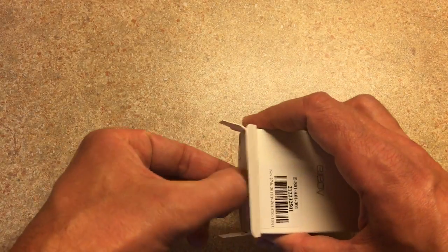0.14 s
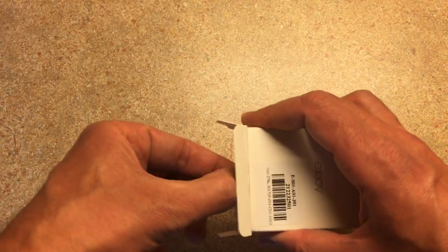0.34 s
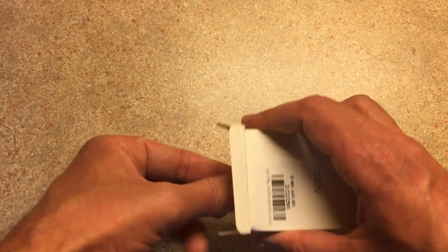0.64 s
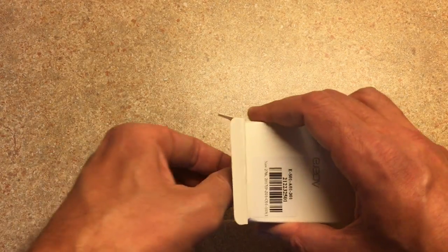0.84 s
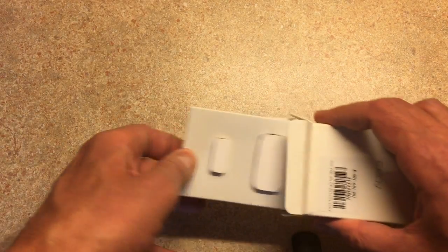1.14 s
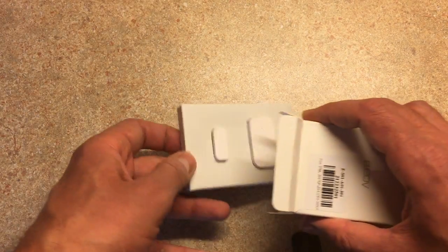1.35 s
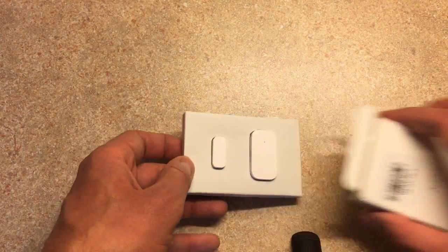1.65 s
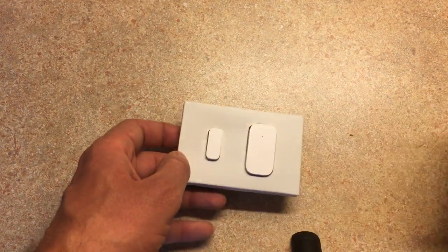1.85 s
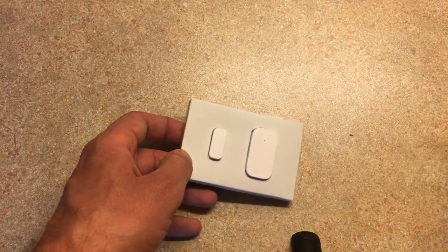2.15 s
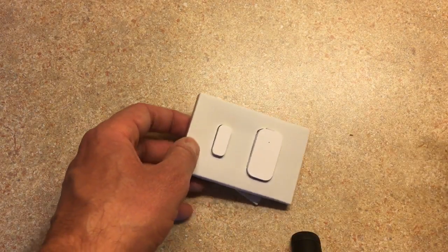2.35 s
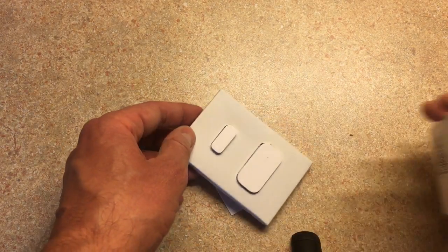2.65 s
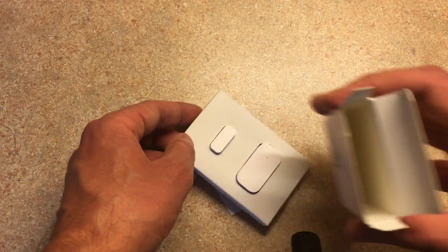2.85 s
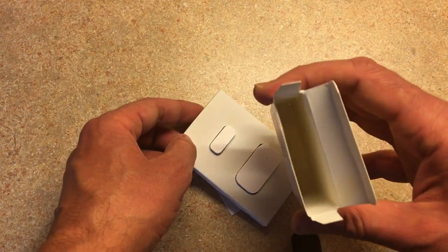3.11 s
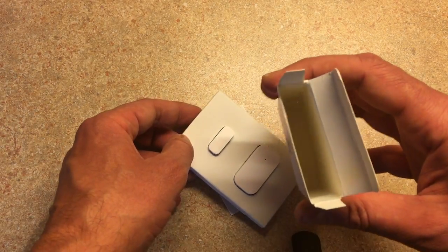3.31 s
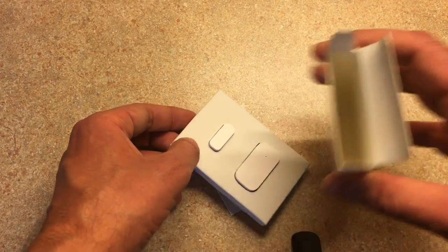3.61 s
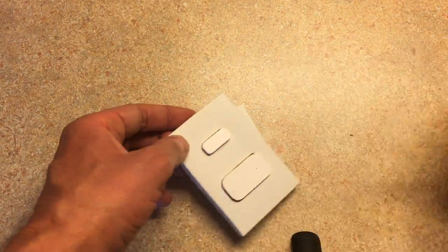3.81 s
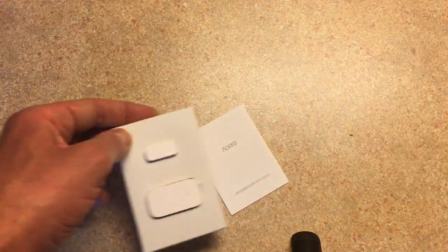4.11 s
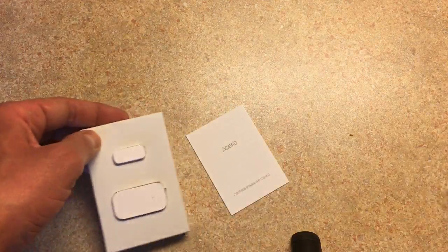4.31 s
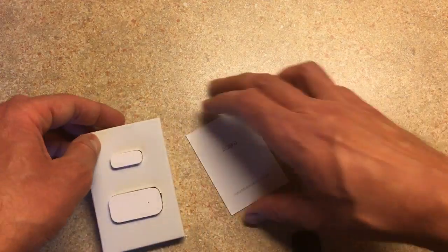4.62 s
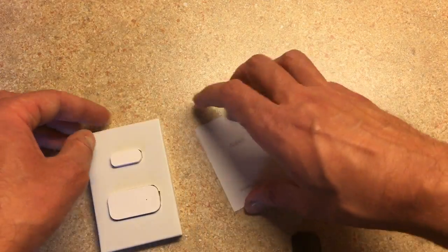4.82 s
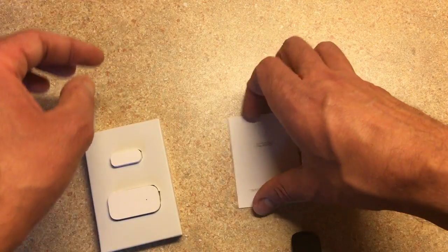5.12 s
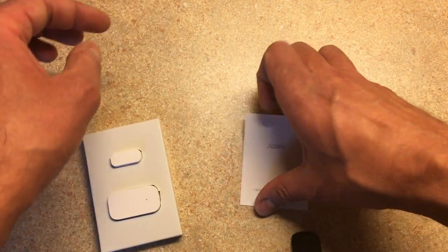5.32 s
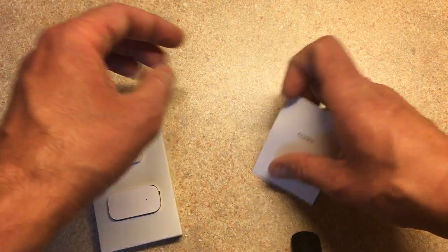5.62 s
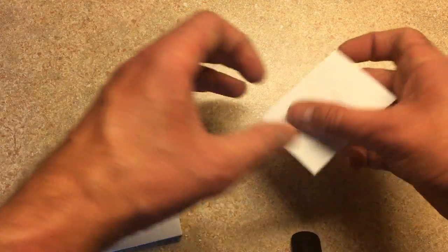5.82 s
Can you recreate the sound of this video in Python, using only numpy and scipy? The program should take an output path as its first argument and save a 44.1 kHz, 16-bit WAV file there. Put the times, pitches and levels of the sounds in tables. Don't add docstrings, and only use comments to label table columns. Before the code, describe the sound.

Close, dry sound of hands unpacking a small cardboard box on a table in a quiet room with faint low hum and slight echo. It opens with finger rubs and a small tap, then around 0.5-0.8 s a cluster of light hollow taps and crisp flap crackles. At 1.0-1.25 s the tray slides out with a bright papery scrape, clicks and brief squeaks. Hollow card knocks follow at about 1.3, 1.4 (stronger), 1.55-1.7 and 2.03 s. From 2.1 to 3.7 s there are only faint brushes and shuffles. Soft rubs and small bumps come at 3.8-4.3 s, a clear tap at 4.46 s, a sharp hard knock at 4.78 s and another at 4.88 s. Short low rubbing jolts accompany dragging on the table until 5.4 s. A very sharp, bright paper snap cracks at 5.29 s, followed by crackles near 5.4 s, small creases and light ticks around 5.8 s, then quiet.

```python
import sys
import numpy as np
from scipy import signal
from scipy.io import wavfile
from scipy.ndimage import uniform_filter1d

SR = 44100
rng = np.random.default_rng(int(sys.argv[2]) if len(sys.argv) > 2 else 0)


def to_wav(s):
    ch = np.atleast_2d(s).T
    pcm = np.round(np.clip(ch, -1, 1) * 32767)
    wavfile.write(sys.argv[1], SR, pcm.astype(np.int16))


def ratio_of_db(decibels):
    return 10 ** (np.asarray(decibels, float) / 20)


N = 262832

# (frequency [Hz], density [dB per Hz])
AIR_SPECTRUM = [(18, -44), (33, 3.5), (42, -14), (54, -9), (64, 4), (81, -10.5), (98, -24), (164, -20.5),
                (227, -32), (341, -25.5), (497, -38), (1030, -29.5), (1390, -32.5), (1540, -34),
                (2130, -43), (14500, -57.5), (19000, -93)]
# (frequency [Hz], width [Hz], level [dB])
RUMBLE_BANDS = [(66.3, 9.5, -62)]
# (frequency [Hz], t60 [s])
ROOM_DECAY = [(200, 0.68), (1500, 0.31), (5000, 0.085), (15000, 0.11)]
# (time [s], peak level [dB])
SHUDDERS = [
    (1.469, -56),
    (2.039, -47),
    (4.06, -58),
    (4.259, -50.5),
    (4.879, -49),
]
# (time [s], level [dB], decay rate [dB/s])
DRAG_JOLTS = [
    (4.666, -52.5, 296),
    (4.728, -49.5, 120),
    (4.864, -41, 198),
    (4.925, -46, 160),
    (5.007, -47, 201),
    (5.078, -44.5, 217),
    (5.228, -49.5, 600),
    (5.352, -47.5, 700),
    (5.42, -63, 899),
]
# (time [s], rms level [dB], frequency [Hz], length [s])
SQUEAKS = [(.475, -60, 3900, .012), (.486, -58, 4000, 0.0076), (1.008, -49.5, 5400, 0.014),
           (1.025, -32, 1186, .004), (1.062, -43.5, 2450, 0.011), (1.061, -45.5, 3650, 0.0087),
           (1.076, -48, 1740, .016), (1.077, -46, 4050, .007), (1.11, -55, 1490, .02),
           (1.115, -54, 3500, 0.027), (1.145, -52.5, 6500, 0.026), (1.162, -54, 8000, .02),
           (1.165, -50.5, 6900, .02), (1.185, -53, 6000, .02), (1.2, -56, 1750, 0.034),
           (1.462, -51, 1600, 0.015), (1.635, -58.5, 1750, 0.026), (1.945, -64, 3200, 0.026),
           (3.871, -52, 680, .008), (3.86, -54, 1390, .02), (3.925, -57.5, 2300, 0.028),
           (4.782, -32, 1194, 0.00502), (4.457, -40, 1750, 0.00398), (4.83, -49.5, 1230, .02),
           (5.088, -59, 3200, 0.014), (5.085, -57, 2050, 0.013), (5.117, -56.5, 3200, 0.019),
           (5.115, -55, 2200, 0.018), (5.122, -50.5, 1070, 0.023), (5.135, -58, 2450, 0.019),
           (5.09, -50, 505, .04), (5.347, -54, 6400, 0.014), (5.685, -60, 2450, .02),
           (5.573, -52, 7800, 0.019)]
# (time [s], peak level [dB], centre frequency [Hz], sparkle
# [dB])
CREASE_SNAPS = [(.083, -48, 2880, -12), (.131, -49, 2320, -6), (0.568, -33.5, 2150, -20),
                (.5935, -37.5, 3550, -20), (.6075, -40, 5640, -16), (.617, -30, 5940, -4),
                (0.627, -35.5, 2580, -4), (1.075, -34, 4190, -16), (1.29, -59, 2110, -21),
                (1.579, -43.5, 2160, -20), (2.693, -43.5, 2210, 0), (3.8157, -48, 2800, -4),
                (3.888, -46, 2050, 10.5), (4.034, -51, 2000, -20), (4.46, -45, 2220, -21),
                (4.818, -42, 2020, -4), (5.0244, -37, 4500, -2), (5.2154, -59.5, 2230, 2),
                (5.225, -41, 2060, -12), (5.249, -54.5, 2490, 10.5), (5.2877, -16, 4520, 3),
                (5.2936, -15.5, 2290, -14), (5.386, -36.5, 4430, -21), (5.399, -29.5, 2090, -19),
                (5.4056, -33, 5740, -19), (5.4212, -27.5, 6600, -18), (5.536, -41, 3180, -22),
                (5.565, -42, 4230, -19), (5.576, -37, 7400, -11), (5.793, -36.5, 4030, -9),
                (.989, -43, 2000, -15), (1.005, -30, 1990, -13), (1.0125, -30, 2200, -15),
               (1.045, -35, 2600, -12), (3.878, -60, 9000, 10), (4.2575, -45, 4500, 2),
               (4.865, -44, 5000, -10), (5.379, -45, 6000, -15), (5.5024, -49, 4620, -10),
               (5.557, -47, 7700, -5), (5.711, -42, 9500, -3), (5.716, -50, 9000, -1),
               (5.427, -39, 6800, -8), (5.788, -49, 7900, 6), (.5965, -36, 6200, -6),
               (1.688, -46, 5500, -17), (5.2915, -21, 4500, -2), (5.2965, -28, 3000, -4),
               (1.305, -36, 5900, -5), (4.7743, -32, 3820, -16), (5.346, -42, 6400, -10),
               (5.569, -46, 5000, -8), (5.58, -46, 3500, -8), (5.686, -50, 2400, -8), (3.924, -51, 5970, 2)]
# (frequency [Hz], density [dB per Hz])
CRACK_SPECTRUM = [(470, -84), (800, -53), (2050, -5.5), (3870, -3.5), (5250, -4), (7920, -9.5),
                  (13800, -14), (16400, -19), (19000, -31)]
# (frequency [Hz], density [dB per Hz])
HISS_SPECTRUM = [(240, -54), (400, -42), (609, -26.5), (1660, -36), (2440, 1.5), (2780, 0), (3600, 2.5),
                 (9040, 3), (16400, -3), (17500, -15), (19000, -60)]
# (frequency [Hz], density [dB per Hz])
WALL_SPECTRUM = [(300, -40), (550, 0), (900, -6), (1300, -2), (1800, -4.5), (2400, -3.5), (3200, -18),
                 (5000, -38.5)]
# (frequency [Hz], width [Hz], gain [dB])
FLAP_RESONANCES = [(2260, 260, 4), (3460, 2400, 6), (5970, 1200, 3)]
# (time [s], hiss level [dB], rise [s], fall [s])
BRUSHES = [(0, -39.5, .0063, 0.028), (.036, -45, 0.037, 0.05), (0.246, -50.5, 0.018, 0.079),
           (0.365, -53.5, 0.024, 0.033), (.917, -54.5, 0.085, 0.029), (1.51, -56.5, 0.047, 0.016),
           (1.585, -57.5, .01, .054), (1.935, -52.5, 0.051, 0.063), (2.035, -52.5, 0.021, 0.1),
           (2.125, -62, .05, 0.051), (2.286, -55, 0.038, 0.12), (2.68, -66, .06, 0.063),
           (2.915, -63, 0.068, .052), (2.952, -61, .04, .011), (3.544, -62.5, 0.094, 0.02),
           (3.665, -55, 0.053, 0.031), (3.93, -49.5, 0.061, 0.015), (3.957, -61, 0.022, .012),
           (4.068, -60, 0.015, 0.016), (5.002, -58.5, 0.049, 0.065), (5.397, -48.5, 0.025, 0.086),
           (5.514, -61, 0.02, 0.13), (5.57, -51.5, 0.029, 0.043), (5.712, -59.5, 0.87, 0.13)]
# (time [s], hiss level [dB], rise [s], fall [s], brightness [dB])
SCRAPES = [(.505, -50, 0.055, 0.012, -3.5), (.62, -57, 0.18, 0.097, -4.5), (1.01, -46.5, 0.03, 0.13, 2.5),
           (1.775, -60.5, 0.077, 0.096, -1.5), (2.442, -70.5, 0.067, 0.059, 9.5),
           (2.518, -62.5, 0.04, 0.23, 2.5), (2.567, -73, 0.17, 0.12, -10), (2.905, -69, 0.18, 0.14, 4.5),
           (4.07, -67, 0.22, 0.25, -1), (4.537, -62, .052, 0.056, 5.5), (4.695, -63, 0.018, .091, 1),
           (4.748, -66, 0.04, 0.022, 12.5), (4.777, -60, .008, 0.03, -10), (4.905, -56, 0.39, 0.064, -2.5),
           (5.078, -64.5, 0.0068, 0.12, -6), (5.194, -69.5, .099, 0.32, -1),
           (5.69, -72.5, 0.048, 0.088, 16), (5.791, -63.5, 0.019, 0.018, 16)]
# (time [s], hiss level [dB], rise [s], fall [s], brightness [dB])
SLIDES = [(1.001, -42, .01, 0.094, -3), (1.043, -47, .032, .11, -9), (1.071, -42.5, .038, 0.24, 4.5),
          (1.127, -53.5, .04, 0.064, 11.5), (1.163, -42.5, .07, 0.081, -3), (5.298, -52, .0027, 0.23, -5),
          (5.338, -63.5, .044, .06, -21), (5.47, -66, .06, .08, 12), (5.67, -68, .1, .08, 12),
          (1.295, -64, .02, .015, 14), (1.13, -48, .05, .06, 0), (4.82, -58, .03, .03, -10),
          (5.94, -78, .062, 0.065, 15)]
# (time [s], body level [dB], rise [s], fall [s])
SQUEEZES = [(.074, -58.5, .047, 0.14), (.213, -58, 0.071, 0.39), (.763, -60.5, 0.092, 0.27),
            (.875, -54, 0.2, 0.17), (1.202, -49.5, 0.039, 0.082), (1.289, -52.5, 0.017, 0.082),
            (1.418, -44, 0.024, 0.13), (1.55, -45.5, 0.006, 0.1), (1.669, -54, .0027, 0.13),
            (2.137, -54, 0.046, 0.054), (3.865, -50.5, 0.1, 0.061), (4.185, -58, 0.24, .022),
            (4.275, -53.5, 0.11, 0.051), (4.47, -39, 0.012, 0.025), (4.806, -47.5, .024, 0.17),
            (5.121, -43, 0.054, 0.035)]
# (frequency [Hz], level [dB], t60 [s])
BOX_MODES = [(707, -15.5, 0.059), (855, 0.5, 0.017), (1190, -13, 0.095), (1370, -15, 0.033),
             (1400, -20.5, 0.037), (1690, -8.5, 0.045), (1850, -6, 0.025), (2400, -16, .04),
             (2900, -27, .035)]
# (frequency [Hz], level [dB], t60 [s])
TABLE_MODES = [(75, -19, 0.028), (145, -2, 0.063), (224, -11, 0.089), (345, -1, .07), (517, -13.5, 0.16)]
# (time [s], peak level [dB], own ring [Hz], crack re peak [dB])
EDGE_TAPS = [(.002, -28, 2350, -6), (.01, -50, 2190, -8), (.109, -49.5, 1100, -6), (.475, -33, 1370, -26),
             (0.4887, -34.5, 1480, -21), (.51, -33, 1370, -25), (.547, -39, 1380, -28),
             (0.578, -37.5, 1430, -5), (.594, -55, 2460, 8), (0.672, -33.5, 1370, -37),
             (0.768, -37.5, 1500, -19), (1.001, -32.5, 1540, -11), (1.011, -37, 1810, 1),
             (1.3027, -26, 1660, -11), (1.551, -25.5, 1320, -17), (1.585, -30, 855, -20),
             (1.677, -37.5, 1370, -7), (1.681, -29.5, 1480, -44), (1.688, -34, 1500, -16),
             (2.033, -31.5, 1335, -34), (2.039, -29.5, 1430, -16.5), (3.817, -47, 1490, -7),
             (4.455, -23, 1260, -15.5), (4.461, -28, 1700, -16), (4.74, -39, 1500, -20),
             (4.7751, -16, 1404, -11.5), (4.779, -24, 1190, -22), (4.823, -38, 1190, -20),
             (4.878, -28, 1690, 0), (5.779, -51, 2240, -10), (5.79, -39, 1930, -18),
             (5.804, -36.5, 1150, -26)]
# (time [s], peak level [dB], own ring [Hz], crack re peak [dB])
MORE_EDGE_TAPS = [
    (.772, -41.5, 1380, -14),
    (1.4145, -22, 1460, -14),
    (1.418, -26.5, 1950, -11),
    (1.555, -31.5, 800, -22),
    (1.698, -35, 750, -24),
    (4.886, -34, 1140, -10),
    (4.262, -37, 880, -9),
    (4.466, -36, 2360, -15),
    (3.83, -47.5, 1300, -20),
    (3.89, -47, 1500, -20),
]
# (time [s], peak level [dB], own ring [Hz], crack re peak [dB])
SCUFFS = [
    (.037, -40, 2260, 1),
    (1.073, -37.5, 1680, -10),
    (1.249, -36, 1990, -2),
    (2.529, -51, 646, -14),
    (3.855, -39, 1340, -25),
    (3.869, -42, 666, -30),
    (4.477, -36.5, 1530, -30),
]
# (time [s], peak level [dB], own ring [Hz], crack re peak [dB], thud re peak [dB])
TABLE_BLOWS = [(1.024, -29, 1190, -16, -12), (1.063, -34.5, 2500, -14, -8), (1.593, -34.5, 1450, -12, -11),
               (1.413, -19, 1476, -8, -14), (2.03, -27, 1444, -38, -16), (3.56, -52, 630, -17, 6),
               (4.09, -48, 1690, -5, -1.5), (4.165, -43.5, 495, -10, -1), (4.205, -49, 950, -10, 0),
               (4.243, -47, 517, -4, -8), (4.258, -37, 1030, -9.5, -4.5), (4.661, -49.5, 1030, -12, 5.5),
               (4.882, -28, 1163, -24, -7), (5.079, -43, 523, -19, 1), (5.134, -36, 530, -5.5, -3),
               (5.231, -47.5, 549, -10, 5.5), (5.289, -29.5, 2210, 5.5, -9), (5.351, -48, 473, -1, 8),
               (5.558, -56.5, 2210, 14, 10.5), (5.665, -44.5, 2320, -13, -15), (5.712, -52, 2320, -7, -28)]

BRUSH_BODY_DB, BRUSH_BRIGHT_DB = -2.5, 0
SCRAPE_BODY_DB, SLIDE_BODY_DB = 5.5, -6.5
SQUEEZE_HISS_DB, SQUEEZE_BRIGHT_DB = -19.5, -9
EDGE_THUD_DB, EDGE_RATTLE_S = -26, 0.0038
SCUFF_THUD_DB, SCUFF_RATTLE_S = -11, 0.014
BLOW_RATTLE_S = 0.0059


def rms_one(x):
    return x / np.sqrt(np.mean(x ** 2) + 1e-20)


def peak_one(x):
    return x / (abs(x).max() + 1e-20)


def read(points, hz):
    f, value = np.transpose(points)
    return np.interp(np.log(hz + 1), np.log(f + 1), value)


def add(mix, s, sound):
    part = mix[max(round(s * SR), 0):][:len(sound)]
    part += sound[:len(part)]


def filtered(x, order, hz, kind):
    return signal.sosfilt(signal.butter(order, hz, kind, fs=SR, output="sos"), x)


def resonate(x, hz, width):
    return signal.lfilter(*signal.iirpeak(hz, max(hz / width, .3), SR), x)


def coloured(x, points):
    hz = abs(np.fft.fftfreq(4096, 1 / SR))
    log_gain = np.log(ratio_of_db(np.maximum(read(points, hz), -100)))
    taps = np.fft.ifft(np.exp(np.conj(signal.hilbert(log_gain)))).real[:2048]
    return signal.oaconvolve(x, taps)[:len(x)]


def room_tone():
    patches_db = rms_one(uniform_filter1d(rng.standard_normal(N), 6000))
    air = rms_one(coloured(rng.standard_normal(N), AIR_SPECTRUM))
    air = rms_one(filtered(air, 4, 85, "high"))
    hum = ratio_of_db(-59) * np.sqrt(2) * np.sin(2 * np.pi * 49.2 * np.arange(N) / SR)
    rumble = 0
    for hz, width, db in RUMBLE_BANDS:
        band = resonate(resonate(rng.standard_normal(N), hz, width), hz, width)
        rumble = rumble + ratio_of_db(db) * rms_one(band)
    return ratio_of_db(-59.5 + patches_db) * air + rumble + hum


def room(x):
    taps = np.zeros(SR // 2)
    at = np.arange(150, len(taps) - 20, 20)
    taps[at + rng.integers(0, 20, len(at))] = rng.choice([-1., 1.], len(at))
    hz, t, z = signal.stft(taps, SR, nperseg=256)
    decay_db = -60 * t / read(ROOM_DECAY, hz)[:, None]
    tail = signal.istft(z * ratio_of_db(decay_db), SR, nperseg=256)[1]
    return signal.fftconvolve(x, tail / np.linalg.norm(tail))[:N]


def shudder(s, db):
    hz, t60, rise = 69.8, 0.8, 0.017
    t = np.arange(SR) / SR
    envelope = ratio_of_db(db - 60 * t / t60) * np.minimum(t / rise, 1)
    return s, envelope * np.sin(2 * np.pi * hz * t)


def drag():
    s, db, dying = np.transpose(DRAG_JOLTS)[:, :, None]
    since = np.arange(N) / SR - s
    shake = rng.standard_normal(N)
    lumps_db = 2.6 * rms_one(uniform_filter1d(rng.standard_normal(N), 700))
    shake = shake * ratio_of_db(lumps_db)
    hum = rms_one(resonate(shake, 345, 28))
    hum = hum + .2 * rms_one(resonate(resonate(shake, 400, 450), 400, 450))
    rise_db_per_s = 1499
    level = db - np.maximum(-rise_db_per_s * since, dying * since)
    return hum * ratio_of_db(level.max(0))


def squeak(s, db, hz, length, grit):
    rough, width = 1.6, .13 * hz
    t = np.arange(min(round(2 * length * SR), len(grit))) / SR
    fuzz = rms_one(resonate(resonate(grit, hz, width), hz, width))[:len(t)]
    tone = np.sqrt(2) * np.sin(2 * np.pi * hz * t) + rough * fuzz
    tone = tone / np.hypot(1, rough)
    return s - length, ratio_of_db(db) * np.hanning(len(t)) ** 2 * tone


def snap(s, db, hz, sparkle_db, grit):
    length = 0.0014 + 0.00011 * hz / 1e3
    t = np.arange(len(grit)) / SR
    burst = grit * np.exp(-t / max(length, .0002)) * np.minimum(t / 0.00015, 1)
    wide = coloured(burst, CRACK_SPECTRUM)
    top = filtered(wide, 2, 8000, "high")
    body = peak_one(peak_one(wide - top) + 0.88 * peak_one(resonate(burst, hz, 360)))
    return s, ratio_of_db(db) * (body + ratio_of_db(sparkle_db) * peak_one(top))


def strokes():
    brushes = [(*row, BRUSH_BODY_DB, BRUSH_BRIGHT_DB) for row in BRUSHES]
    scrapes = [(*row, SCRAPE_BODY_DB, bright) for *row, bright in SCRAPES]
    slides = [(*row, SLIDE_BODY_DB, bright) for *row, bright in SLIDES]
    squeezes = [(s, db + SQUEEZE_HISS_DB, *span, -SQUEEZE_HISS_DB, SQUEEZE_BRIGHT_DB)
                for s, db, *span in SQUEEZES]
    return brushes + scrapes + slides + squeezes


def rubbing(patchy_db=1.6, catches=.006, catch_db=3.0, flutter_db=0.96):
    s, db, rise, fall, body_db, bright_db = np.transpose(strokes())[:, :, None]
    t = np.arange(N // 64 + 5) * 64 / SR
    hz = np.fft.rfftfreq(256, 1 / SR)[:, None]

    rising = -2 * (t - s) / np.maximum(rise, .004)
    falling = 2 * (t - s) / np.maximum(fall, .004)
    speed = 1 / (10 ** np.clip(rising, -30, 30) + 10 ** np.clip(falling, -30, 30))

    def total(offset_db):
        return (speed * ratio_of_db(2 * (db + offset_db))).sum(0)

    dull, bright = total(-bright_db), total(bright_db)
    low = total(body_db - .5 * (bright_db + 10.5))
    high = total(body_db + .5 * (bright_db + 0.5))

    share = 1 / (1 + (6500 / (hz + 1)) ** 3)
    upper = 1 / (1 + (1200 / (hz + 1)) ** 4)
    flaps_db = sum(gain / (1 + (2 * (hz - f) / w) ** 2) for f, w, gain in FLAP_RESONANCES)
    hiss = ratio_of_db(2 * (read(HISS_SPECTRUM, hz) + flaps_db)) / (1 + (2000 / (hz + 1)) ** 6)
    walls = ratio_of_db(2 * read(WALL_SPECTRUM, hz))
    power = hiss / hiss.sum() * (dull * (1 - share) + bright * share)
    power = power + walls / walls.sum() * (low * (1 - upper) + high * upper)

    a, b, patches = rng.standard_normal((len(t), 129, 3)).T
    flutter = rms_one(uniform_filter1d(patches[0], 4))
    patches = rms_one(uniform_filter1d(uniform_filter1d(patches, 9, 0), 10, 1))
    spots = 1. * (rng.random((len(t), 129)).T < catches)
    spots = 14 * uniform_filter1d(uniform_filter1d(spots, size=7, axis=0), size=2, axis=1)
    power = power * (1 + ratio_of_db(2 * catch_db) * abs(spots))
    z = (a + 1j * b) * np.sqrt(power) * ratio_of_db(patchy_db * patches + flutter_db * flutter)
    return signal.istft(z, nperseg=256, noverlap=192)[1][:N]


def rings(modes, luck, spread_db, detune=.015):
    hz, db, t60 = np.transpose(modes)[:, :, None]
    t = np.arange(8000) / SR
    shift = 1 + detune * luck[:len(hz), None]
    db = db + spread_db * luck[::-1][:len(hz), None]
    return (ratio_of_db(db - 60 * t / t60) * np.sin(2 * np.pi * hz * shift * t)).sum(0)


def knocks():
    edges = [(*row, EDGE_THUD_DB, EDGE_RATTLE_S) for row in EDGE_TAPS]
    scuffs = [(*row, SCUFF_THUD_DB, SCUFF_RATTLE_S) for row in SCUFFS]
    blows = [(*row, BLOW_RATTLE_S) for row in TABLE_BLOWS]
    more_edges = [(*row, EDGE_THUD_DB, EDGE_RATTLE_S) for row in MORE_EDGE_TAPS]
    return sorted(edges + scuffs + blows) + more_edges


def tap(s, db, hz, crack_db, thud_db, rattle, luck, grit):
    t = np.arange(len(grit)) / SR
    fade = np.exp(-t / max(rattle, .0005))
    after = (0, 8000 - len(grit))
    contacts = .03 * grit ** 3 * fade
    contacts[:7] += np.hanning(7) / 2

    box = rings(BOX_MODES, luck, 3.5)
    own_ring = rings([(hz, 0, .0095)], luck, 0, 0)
    own_ring = own_ring * (1 - np.exp(-np.arange(8000) / SR / .0003))
    ring = peak_one(signal.oaconvolve(contacts, box + ratio_of_db(14) * own_ring)[:8000])
    scatter = peak_one(coloured(np.pad(grit * fade ** 2.44, after), WALL_SPECTRUM))
    panel = filtered(ring + .5 * scatter, 2, .45 * hz, "high")

    crack = coloured(np.pad(contacts + 0.069 * grit * fade, after), CRACK_SPECTRUM)
    crack = filtered(crack, 3, [2800, 10000], "band")
    thud = rings(TABLE_MODES, luck, 3.3)
    sound = peak_one(panel) + ratio_of_db(crack_db) * peak_one(crack) + ratio_of_db(thud_db) * peak_one(thud)
    return s, ratio_of_db(db) * sound


def scene():
    tone = room_tone()
    hands = rubbing() + drag()
    echo = room(np.eye(1, N)[0])[:SR // 2]
    for row, chance in zip(knocks(), rng.standard_normal((80, 2020))):
        add(hands, *tap(*row, chance[:20], chance[20:]))
    for row, grit in zip(CREASE_SNAPS, rng.standard_normal((60, 2000))):
        add(hands, *snap(*row, grit))
    for row, grit in zip(SQUEAKS, rng.standard_normal((60, 4000))):
        add(hands, *squeak(*row, grit))
    for row in SHUDDERS:
        add(tone, *shudder(*row))
    reverberation = ratio_of_db(-15.0) * signal.oaconvolve(hands, echo)[:N]
    return (hands + reverberation + tone)[None]


def band_limit(x):
    return signal.sosfilt(signal.butter(12, 19510, fs=SR, output="sos"), x)


def record(dry):
    mix = dry - .5 * resonate(dry, 10420, 600)
    mix = filtered(mix, 6, 36, "high")
    mix = filtered(mix, 8, 17800, "low")
    return band_limit(mix)


dry = scene()
out = record(dry)
to_wav(out)
```